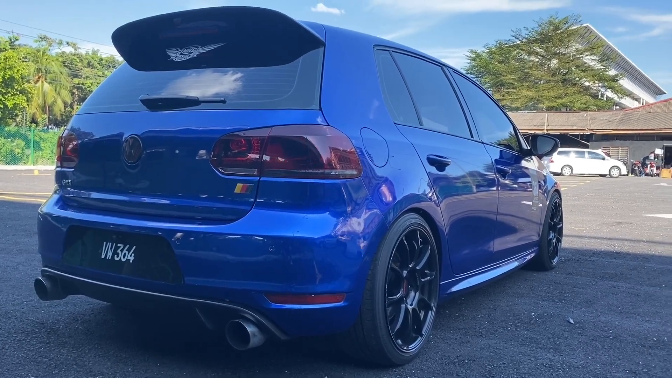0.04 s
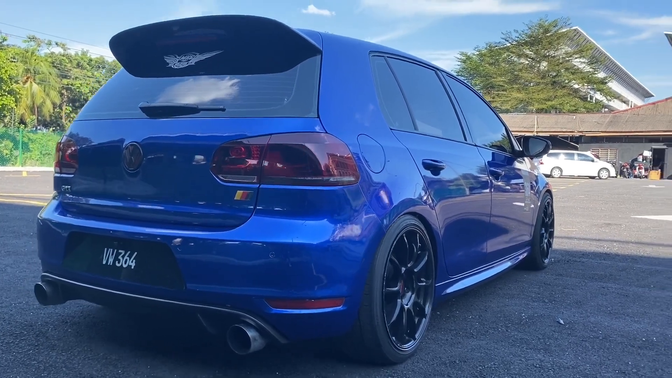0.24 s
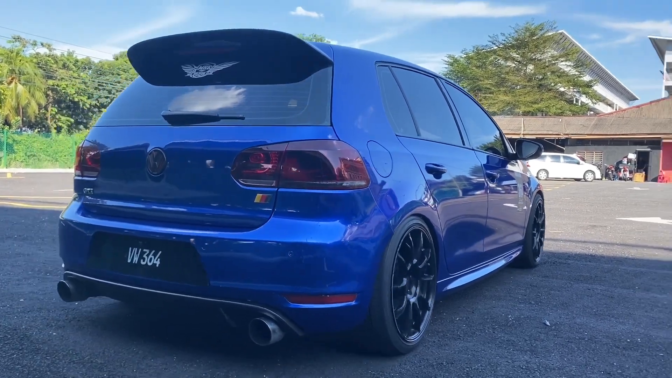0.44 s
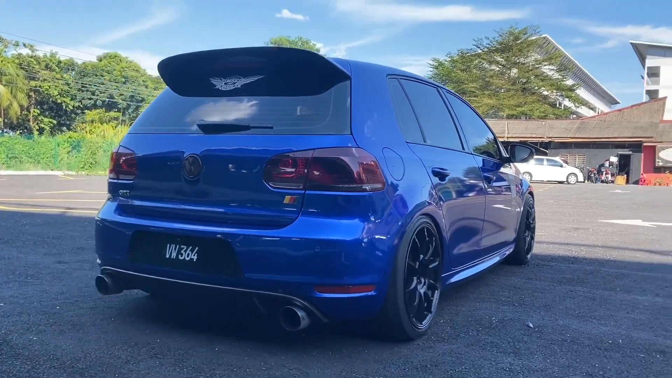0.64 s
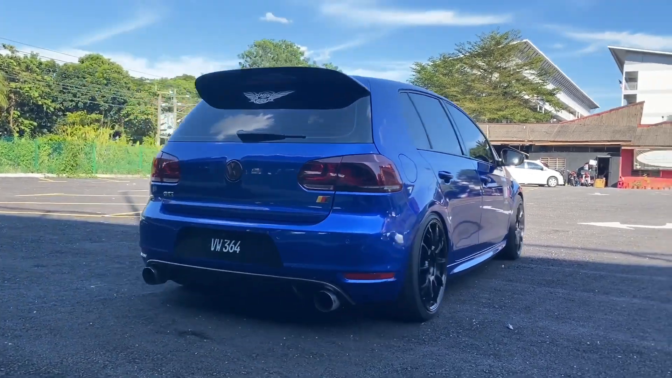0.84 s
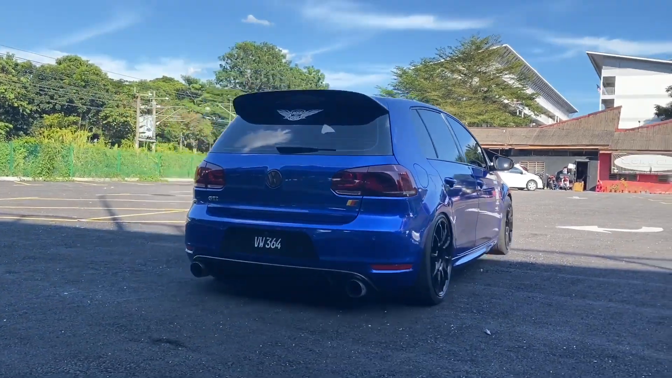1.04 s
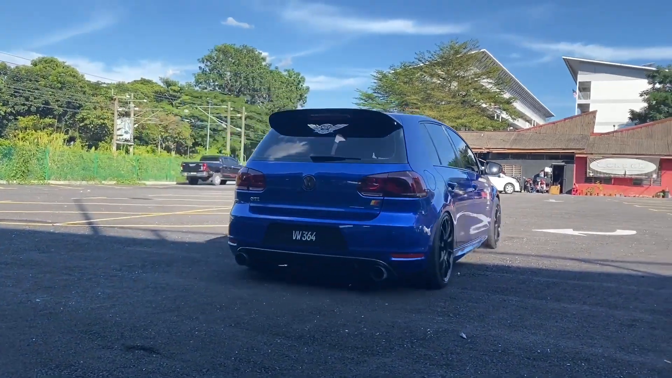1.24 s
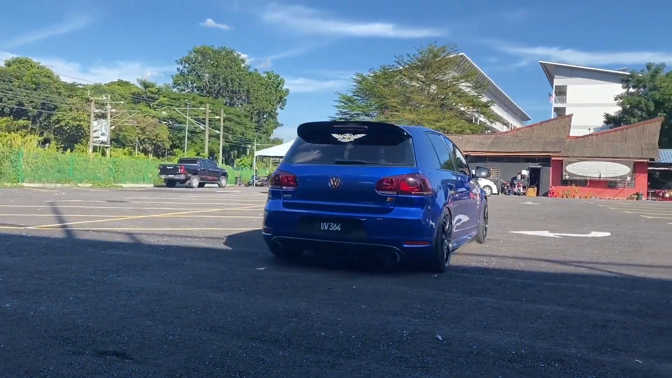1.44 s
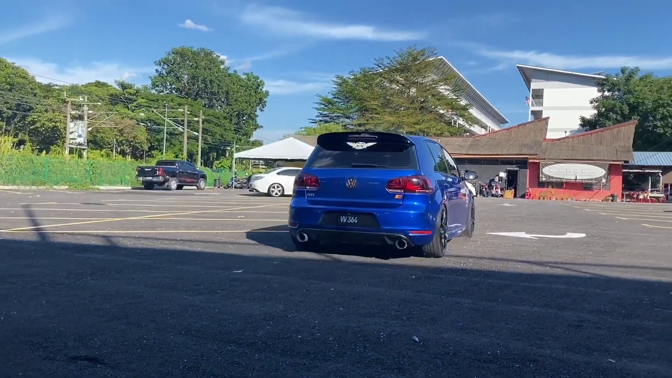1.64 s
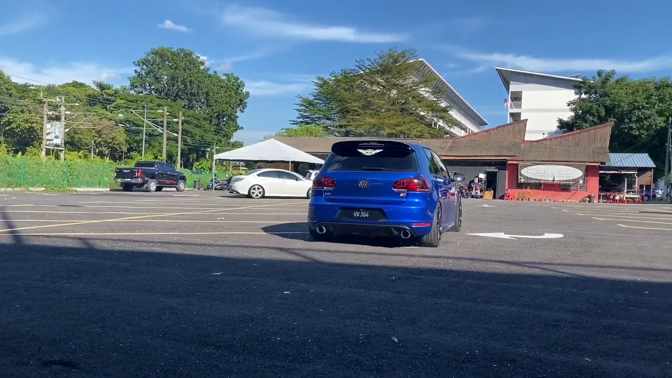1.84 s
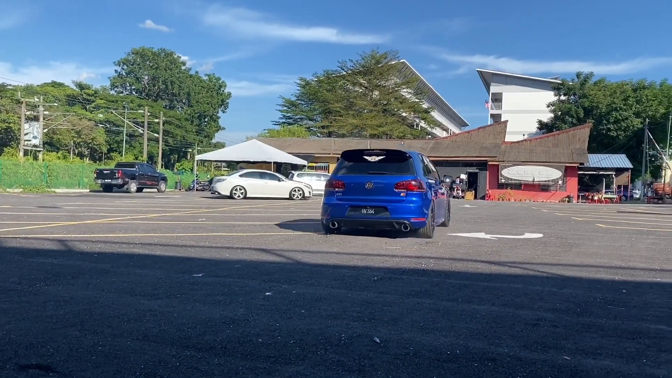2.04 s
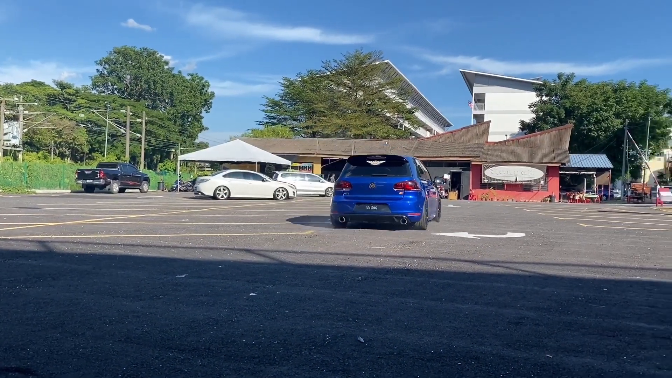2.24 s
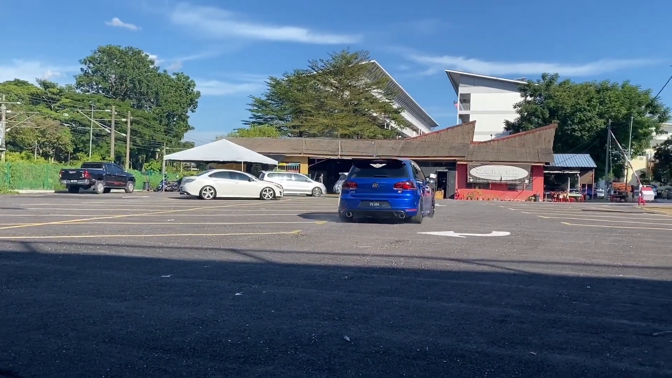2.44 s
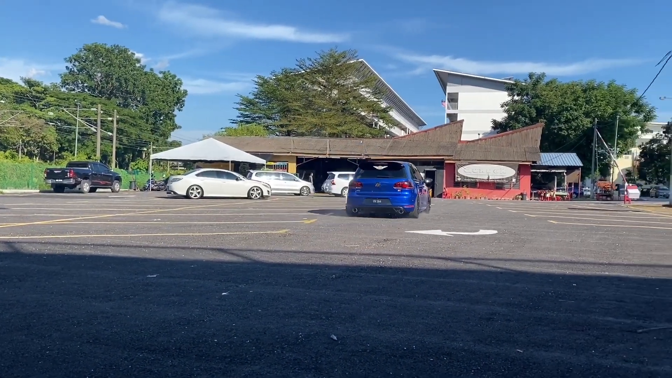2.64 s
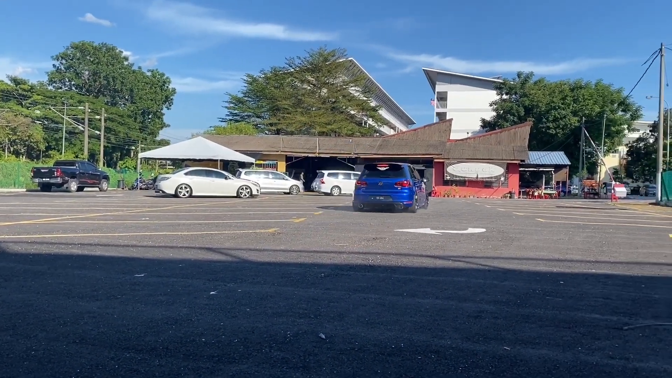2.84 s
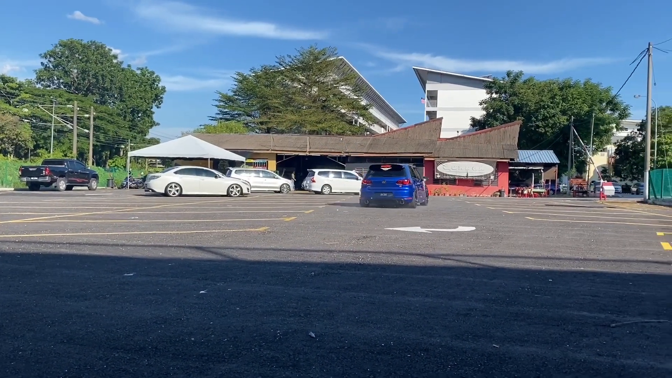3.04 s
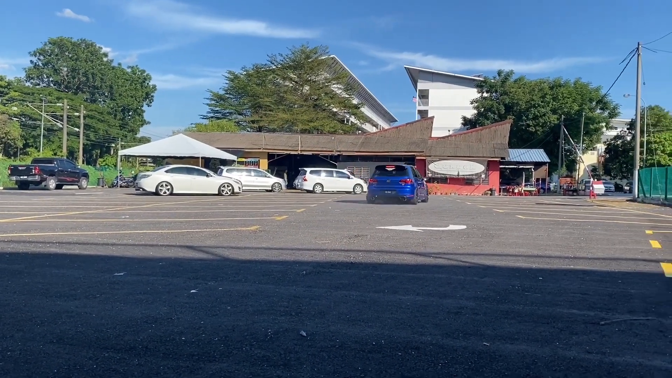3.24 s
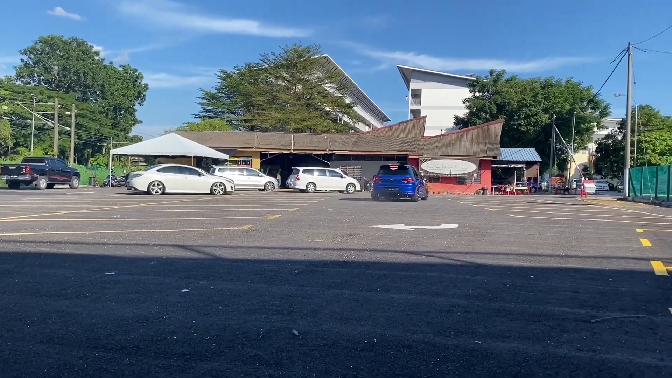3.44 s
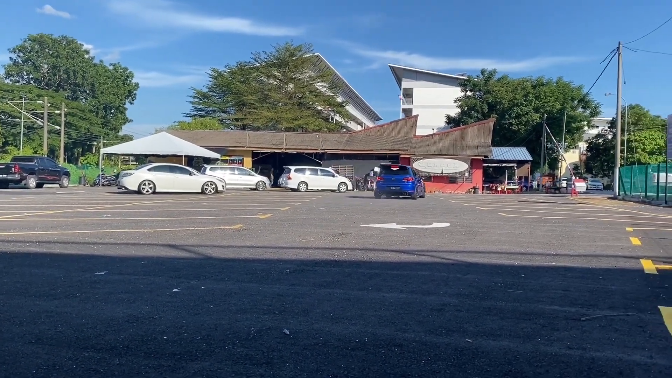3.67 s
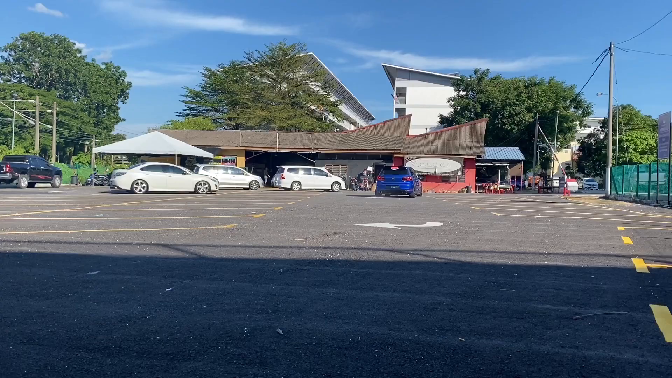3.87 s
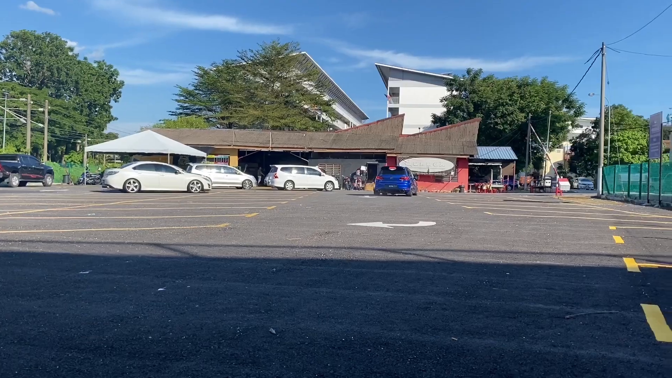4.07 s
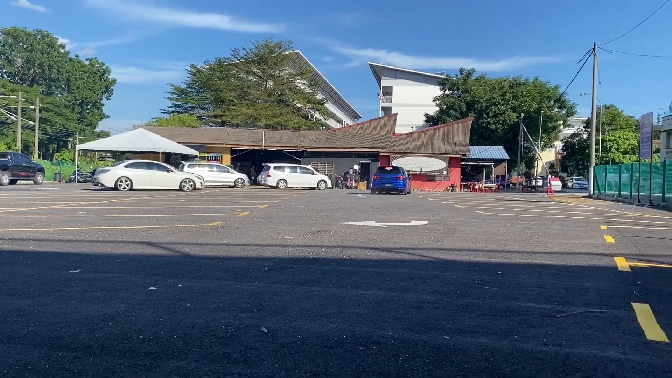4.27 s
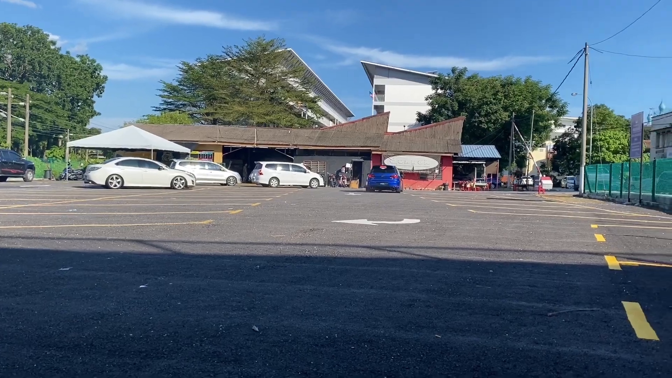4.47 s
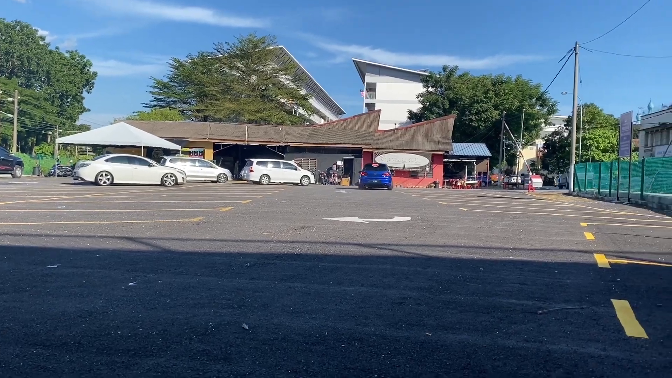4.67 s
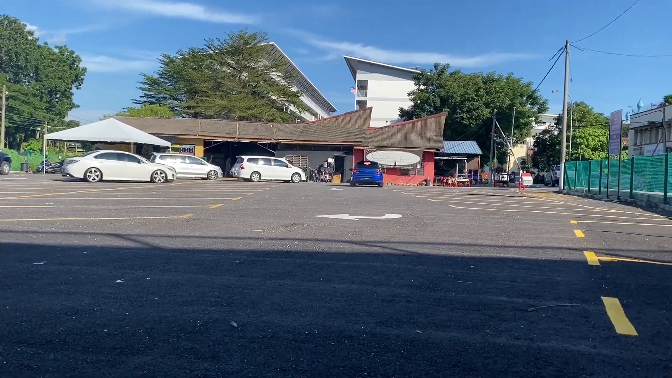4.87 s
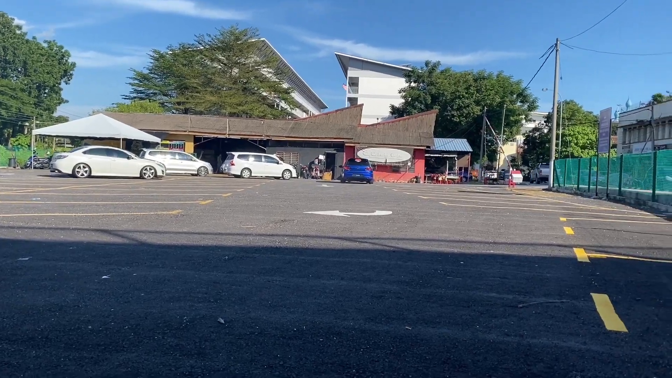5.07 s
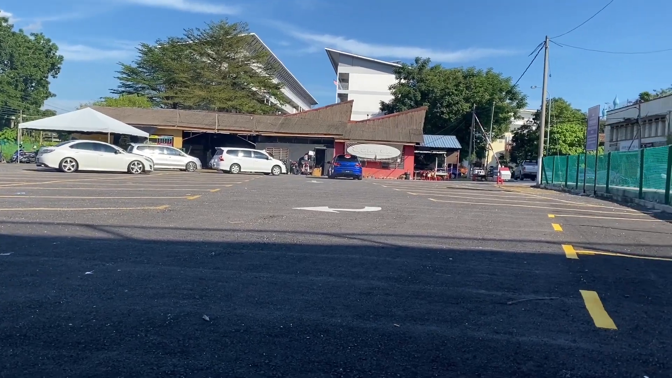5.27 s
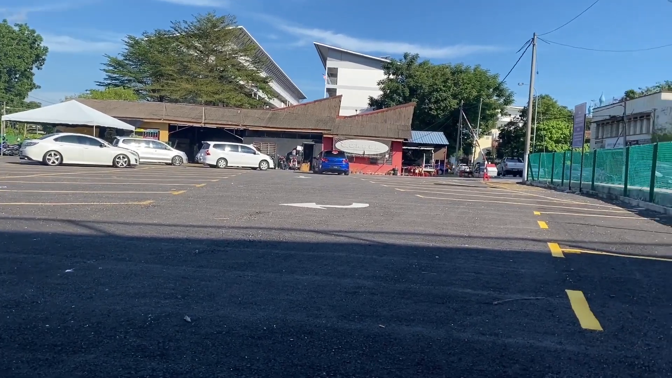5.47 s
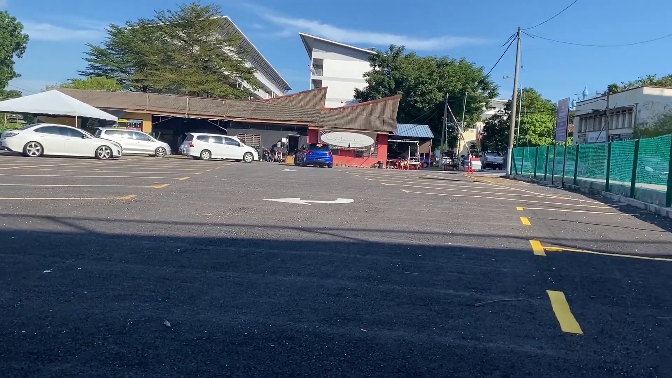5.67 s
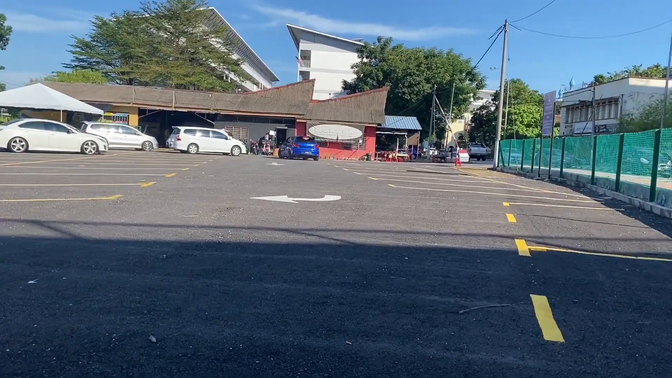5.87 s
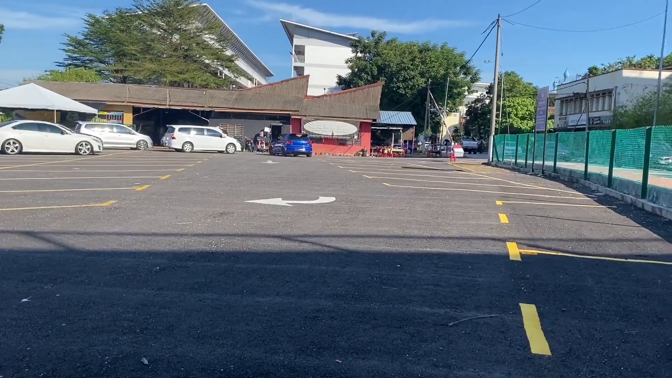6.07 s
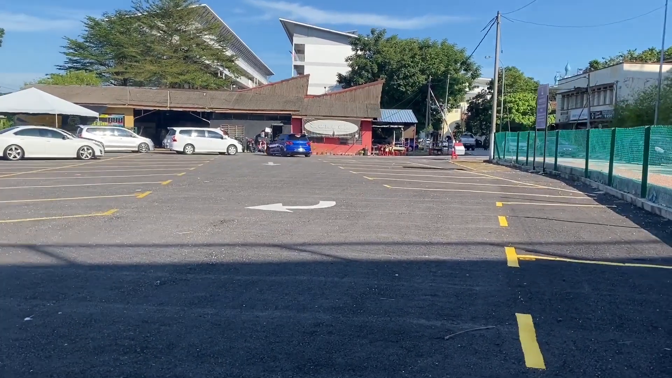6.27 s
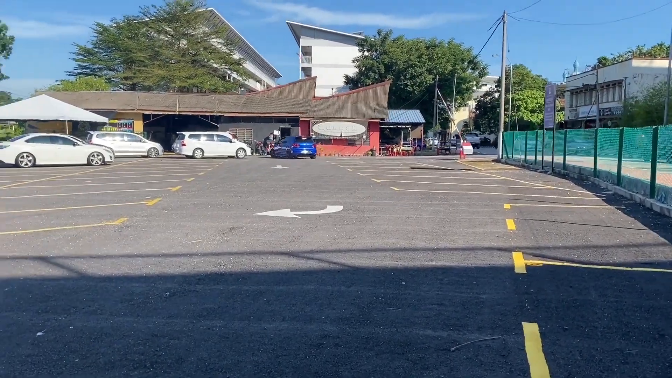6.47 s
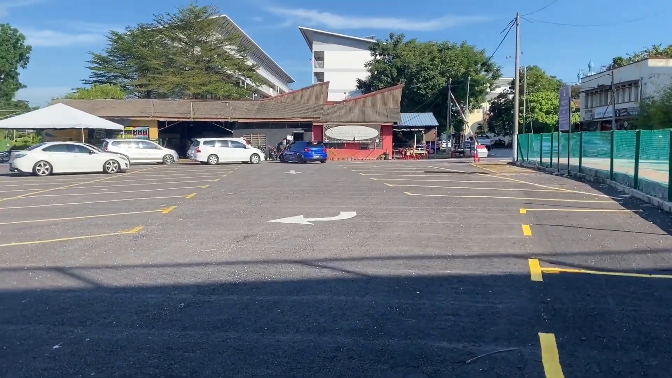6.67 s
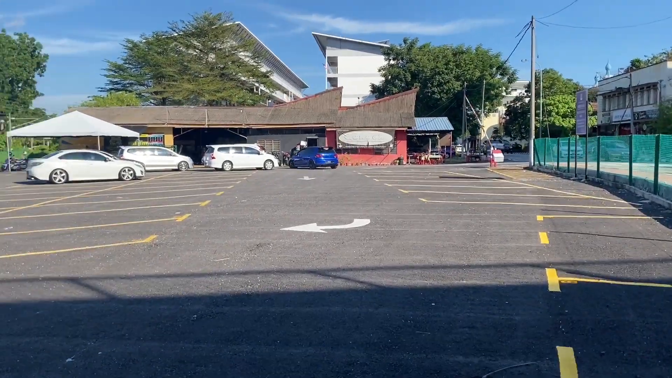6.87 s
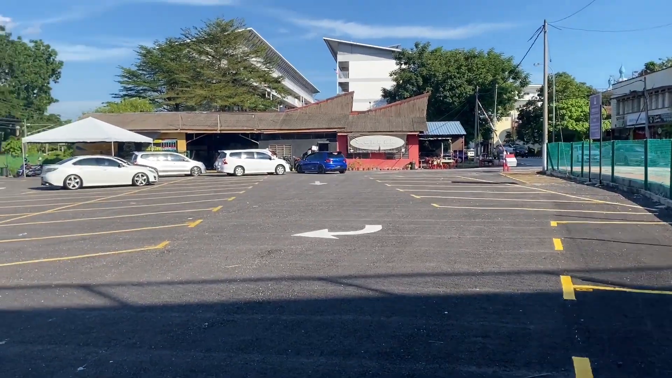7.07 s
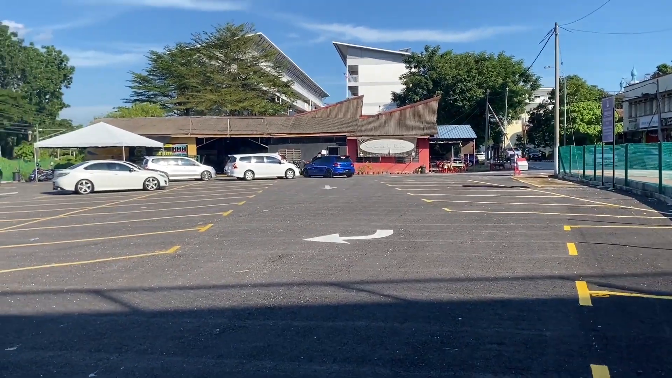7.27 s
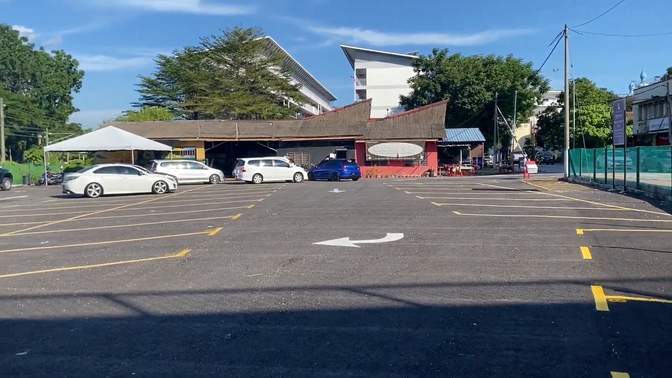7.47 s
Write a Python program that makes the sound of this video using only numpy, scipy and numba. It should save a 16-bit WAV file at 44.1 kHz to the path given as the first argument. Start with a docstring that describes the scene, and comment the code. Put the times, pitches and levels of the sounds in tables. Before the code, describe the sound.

A loud turbocharged hatchback blips and pulls away across an open car park, exhaust rasp climbing, then lifting off into distant burbling and soft traffic.

```python
"""In an open car park, a turbocharged four-cylinder hatchback with a loud exhaust pulls away from close by.
Each firing sends a pressure wave (the boom) and a burst of gas (bark and rasp) through the tailpipes.
At three seconds the driver lifts off: the turbo whistle winds down and the car burbles in the distance.
Tyres flick grit, buildings echo the exhaust, and filtered noise makes the traffic and hiss around the lot."""
import sys
import numpy as np
from scipy import signal
from scipy.fft import rfft, irfft, next_fast_len
from scipy.io import wavfile
from scipy.ndimage import uniform_filter1d
from numba import njit

SR = 44100
rng = np.random.default_rng(int(sys.argv[2]) if len(sys.argv) > 2 else 0)


def master_out(mix):
    """Clip the mix to full scale and print it as 16-bit PCM to the path in sys.argv[1]."""
    frames = np.transpose(np.atleast_2d(mix))
    ceiling = np.clip(frames, -1, 1)
    pcm = np.round(ceiling * 32767).astype(np.int16)
    wavfile.write(sys.argv[1], SR, pcm)


N = 331214  # length in samples
T = np.arange(N) / SR  # time in seconds
RING_LAG = .41  # share of a firing cycle by which the ringing of the pipe trails the pressure wave


def engine_speed():
    """A blip, a long pull and the lift-off set the firing rate; then the revs sag to idle."""
    # the engine (time [s], firing rate [Hz], level of the fundamental [dB])
    revs = [(0.0, 88, -20), (0.08, 98.3, -9.5), (0.1, 102.9, -10), (0.3, 91.45, -13.5), (0.59, 99.3, -16),
            (1.12, 109.8, -13.5), (1.37, 124.5, -15.5), (1.9, 159.5, -11.5), (2.35, 190.4, -20.5),
            (2.64, 209.7, -23), (2.77, 212, -24), (2.91, 200.4, -35.5), (2.97, 194.5, -34.5),
            (3.25, 143.8, -21.5), (3.35, 136.9, -21), (3.45, 136.8, -24.5)]
    sag_hz_per_s, idle_hz = 55, 61.67
    sink_db_per_s, idle_db = 11, -36.5
    hz, fundamental_db = curves(revs)
    sagging_s = np.maximum(T - revs[-1][0], 0)
    hz = np.maximum(hz - sag_hz_per_s * sagging_s, idle_hz)
    return hz, np.maximum(fundamental_db - sink_db_per_s * sagging_s, idle_db)


def boom(turns, drive, fundamental_db):
    """The clean low harmonics of the pressure wave; each overtone swells as it crosses a pipe resonance."""
    # standing waves of the exhaust pipe (frequency [Hz], level [dB])
    pipe = [(125, 13), (188, -12.5), (235, 3), (268, 6), (283, 6.5), (303, 1), (335, 0.5), (376, 5.5),
            (435, 1.5), (520, -3.5), (800, -8)]
    # loudness of harmonics 2, 3 and 4 (close by at full throttle and the reference rate [dB],
    # lost with the throttle shut [dB], gained per octave of revs [dB], power of distance)
    overtone_laws = [(-17, 14, 7.5, 0.93), (-13.5, 29, -1.5, 0.87), (-19, 21.5, -1.5, 0.79)]
    pipe_hz, pipe_db = np.transpose(pipe)
    dip_db = -2.5 * np.exp(-((T - 1.673) / 0.035) ** 2)  # the overtones dip briefly
    tone = undb(fundamental_db + .5 * walk(30)) * np.sin(2 * np.pi * turns)
    for k, law in enumerate(overtone_laws, 2):
        resonance_db = np.interp(np.log(k * drive[0]), np.log(pipe_hz), pipe_db)
        db = loudness(drive, *law) + resonance_db + dip_db
        tone = tone + undb(db + 1.5 * walk(20)) * np.sin(2 * np.pi * k * (turns - RING_LAG))
    return tone


def tailpipe(turns, drive):
    """Each firing cracks in the pipe, then puffs turbulent gas; the colour turns as the car draws away."""
    # colour of the drone in the tailpipe (frequency [Hz], level [dB])
    drone_colour = [(380, -30.5), (480, 1.5), (620, 1.5), (700, -8.5), (800, -28.5)]
    # resonances of the bark (frequency [Hz], half width [Hz])
    bark_modes = [(700, 134), (850, 140), (1130, 113)]
    # balance of the three bark resonances as the car turns away (time [s], level of each [dB])
    bark_balance = [(.4, -17, 0.5, -7), (0.851, -8.5, -4.5, -0.5), (1.2, -1, 0, -9), (1.7, -1, -1.5, -7),
                    (2.3, -4, -3, -4.5)]
    # ringing of the pipe tips, close by and from far behind (frequency [Hz], width [Hz], level [dB])
    near_tips = [(1654, 27, 0), (1815, 45, -5), (2206, 260, -1), (2716, 170, -3), (3380, 110, -9.5)]
    far_tips = [(1408, 61, 6.1), (1530, 99, 3), (1980, 130, 1.9), (2451.6, 99, 6.8)]
    # colours of the jet's edge and of its high hiss (frequency [Hz], level [dB])
    edge_colour = [(2700, -8.5), (3300, -1), (3800, 1), (4100, -2), (4450, -13), (5200, -40.5)]
    jet_colour = [(4200, -13.5), (5100, -6), (6200, -7.5), (7300, -13.5), (8500, -36.5), (10000, -28.5),
                  (14500, -56)]
    # single firings that crack out of the jet hiss (time [s], level [dB])
    cracks = [(1.852, -25), (2.963, -41)]
    gas_lag = .42  # share of a cycle by which the rush of gas follows the crack

    drone_flare, bark_flare, rasp_flare, jet_flare, _ = flares()
    drone_db = drone_flare + loudness(drive, full_db=-22.5, shut_db=10.5, octave_db=10, power=2.1)
    bark_db = bark_flare + loudness(drive, full_db=-25, shut_db=9.5, octave_db=11.5, power=2.25)
    rasp_db = rasp_flare + loudness(drive, full_db=-26, shut_db=20, octave_db=3, power=1.24)
    jet_db = jet_flare + loudness(drive, full_db=-31, shut_db=-2.5, octave_db=7.5, power=1.32)
    far, = curves([(1.0, 0.037), (1.35, 0.54), (1.95, 0.64)])

    # half orders growl as boost builds; at high revs the cracks drown in rushing gas
    growl, crisp = curves([(.95, 0.11, 0.49), (1.2, 0.3, 0.33), (1.9, 0.099, 0.27), (2.7, 0.15, 0.14)])
    # one cylinder in four fires a little harder
    throb = 1 + .3 * np.cos(np.pi / 2 * turns)
    lope = throb + growl * (-1.) ** np.round(turns)
    # the crank speed wanders under boost, which blurs the upper harmonics
    wander, = curves([(.9, .008), (1.25, .015), (1.6, .016), (3.4, .025)])
    crack = lope * firings(turns + wander * walk(70), scatter_db=1.2, jitter_s=.00003)
    crack = crisp * crack / crack.std()

    puff = puffs(turns, rise=.1, scatter_db=1.7)
    drone = steady(colour(crack + 0.5 * puff * air(side=0.15), drone_colour)) * undb(drone_db)

    gas = puff + .5 * puffs(turns, rise=.3, scatter_db=2.5)
    blow = lope * (crack + .4 * gas * air(side=.5))
    bark = 0
    for (hz, half_width), db in zip(bark_modes, curves(bark_balance)):
        bark = bark + band(blow, hz, half_width) * undb(db)
    bark = steady(bark) * undb(bark_db)

    # the treble comes in short, uneven spits
    spit = puffs(turns, rise=.07, scatter_db=2.2)
    spray = .7 * crack + (spit + .05) * air(side=.35)
    rasp = steady((1 - far) * resonate(spray, near_tips) + far * resonate(spray, far_tips))
    rasp = rasp * undb(rasp_db + 1.1 * walk(35))

    # the edge of the jet crackles with each firing; its high hiss follows with the rush of gas
    edge = colour(.3 * crack + (spit + .17) * air(side=.45), edge_colour)
    rush = 1 + 0.47 * np.cos(2 * np.pi * (turns - gas_lag))
    high_hiss = colour(rush * air(side=0.18), jet_colour)
    jet = steady(twin(edge + undb(-4.5) * high_hiss))
    jet = jet * (undb(jet_db) + snaps(cracks, decay_s=.005)) * undb(1.7 * walk(30))
    return drone + bark + rasp + jet


def burble(turns, drive):
    """Strong and weak firings shake the silencer between the harmonics."""
    # colours of the low rumble and of the silencer (frequency [Hz], level [dB])
    rumble_colour = [(25, -20), (42, -12), (60, -4), (145, -5.5), (200, -16), (400, -29.5)]
    silencer_colour = [(140, -10.5), (190, -2.5), (250, -7.5), (300, 3), (340, 8.5), (410, -4),
                       (580, -10.5), (850, -18), (1400, -55)]
    near_db, far_db = -37, -36.5  # low burble, before the flares: close by, and far off throttle
    cycle = turns.astype(int)
    overrun, = curves([(3.35, 0.02), (3.65, 0.96)])  # 0 under load, near 1 off throttle
    chance_sign = np.sign(rng.standard_normal(2048))[cycle]
    strength = .5 * (1 + overrun) * chance_sign + 0.46 * (-1.) ** cycle
    low = steady(colour(firings(turns, scatter_db=1.0, jitter_s=0.00099) * strength, rumble_colour))
    low_gain = (1 - overrun) * undb(near_db - 0.052 * drive[2]) + overrun * undb(far_db)

    # alternate cylinders add half orders under load; off throttle every firing rings the silencer
    nearest = np.round(turns).astype(int)
    uneven = (-1.) ** nearest * (1 - .45 * overrun) + overrun + .3 * rng.standard_normal(2048)[nearest]
    knocks = firings(turns, scatter_db=1.1, jitter_s=.00005) * uneven
    ring = steady(colour(knocks + 0.1 * overrun * rng.standard_normal(N), silencer_colour))
    ring_gain = undb(loudness(drive, full_db=-29, shut_db=17.5, octave_db=8, power=0.5))
    coasting_hum = envelope(start=3.6, attack=0.54, hold=1.1, release=1.1, db=-49)
    return (low * low_gain + ring * np.hypot(ring_gain, coasting_hum)) * undb(flares()[-1])


def snarl(turns, hz):
    """The upper orders snarl as they climb under boost; lower ones drone hollowly as they fall."""
    # colour of the climbing orders (frequency [Hz], level [dB])
    climb_colour = [(520, 4), (700, 7), (880, -2.5), (1050, -6.5), (1200, -7), (1750, -21.5)]
    # colour of the falling orders, which drone through the silencer (frequency [Hz], level [dB])
    hollow_colour = [(130, -1), (245, -14.5), (330, 3), (385, -9), (460, -16.5), (570, -14.5), (680, -24)]
    climbing = orders(turns, hz, climb_colour, np.arange(4.5, 10, .5), half_db=-6)
    falling = orders(turns, hz, hollow_colour, np.arange(2, 7.5, .5), half_db=-6)
    climbing = climbing * envelope(start=1.18, attack=0.22, hold=0.6, release=1.24, db=-38.5)
    return climbing + falling * envelope(start=3.5, attack=0.5, hold=1.05, release=.5, db=-43)


def chatter(turns):
    """Off throttle, uneven puffs flutter in the resonances of the pipe tips."""
    # flutters (start [s], attack [s], hold [s], release [s], level [dB], frequency [Hz], half width [Hz])
    flutters = [(3.428, 0.48, 0.31, 0.59, -56, 1864, 387), (4.005, 0.24, .2, 0.18, -58, 2360, 230),
                (3.5, 0.056, 1.27, 0.63, -65, 3500, 830)]
    alternate = 1 + .3 * (-1.) ** turns.astype(int)
    gas = (.25 + puffs(turns, rise=.18, scatter_db=1.8)) * alternate * air(side=.6)
    return sum(band(gas, hz, half_width) * envelope(*shape) for *shape, hz, half_width in flutters)


def firings(turns, scatter_db, jitter_s):
    """One pulse a cycle; the four cylinders differ, and each firing strays in size and time."""
    # strength of each cylinder in turn (level [dB])
    cylinder_db = [-0.13, 0.98, -0.95, 1]
    count = np.arange(1, int(turns[-1]))
    size_chance, time_chance = rng.standard_normal((2, len(count)))
    at = np.interp(count, turns, np.arange(N)) + jitter_s * SR * time_chance
    at = np.clip(at, 0, N - 2)
    size = undb(np.array(cylinder_db)[count % len(cylinder_db)] + scatter_db * size_chance)
    # share each pulse between the two nearest samples
    sample, part = at.astype(int), at % 1
    return np.bincount(sample, size * (1 - part), N) + np.bincount(sample + 1, size * part, N)


def puffs(turns, rise, scatter_db):
    """Gas after each firing: it swells over a small share of the cycle and dies before the next."""
    age = (turns % 1) / rise
    return age * np.exp(1 - age) * undb(scatter_db * rng.standard_normal(2048)[turns.astype(int)])


def orders(turns, hz, shape, multiples, half_db):
    """Wavering whole and half multiples of the firing rate that slide through a fixed (Hz, dB) colour."""
    shape_hz, shape_db = np.transpose(shape)
    shaken = turns + .014 * walk(70)
    total = 0
    for k in multiples:
        db = np.interp(k * hz, shape_hz, shape_db) + half_db * (k % 1 > 0) + 2.2 * walk(30)
        total = total + undb(db) * np.sin(2 * np.pi * k * (shaken - RING_LAG))
    return total


def flares():
    """The dB that flares of gas add to drone, bark, rasp, jet hiss and silencer."""
    # at the blip, twice as the clutch bites, as boost arrives, at lift-off and on the overrun
    # (time [s], half length [s], added drone [dB], bark [dB], rasp [dB], jet hiss [dB], silencer [dB])
    gas_flares = [(0.092, 0.12, -3.5, 2, 4.5, 6.5, 5), (1.107, 0.047, 4, 1.5, 0, 5, -4.5),
                  (1.241, 0.13, 8.5, 10.5, 1.5, 2, 7), (1.764, 0.12, -9, 8.5, 0, 6, -0.5),
                  (3.0, 0.19, 4, 10.5, 4, -3.5, -0.3), (4.06, 0.94, 12, 7, 4.5, -16.5, 1.6)]
    return sum(np.outer(added, np.exp(-((T - s) / half) ** 2)) for s, half, *added in gas_flares)


def loudness(drive, full_db, shut_db, octave_db, power):
    """Level in dB from the revs, the throttle and the distance."""
    hz, throttle, away_db = drive
    reference_hz = 100  # firing rate at which full_db holds, close by at full throttle
    return full_db - shut_db * (1 - throttle) + octave_db * np.log2(hz / reference_hz) - power * away_db


def resonate(x, modes):
    """Ring (Hz, width, dB) resonances that wander, swell and fade, with little sound outside their range."""
    drift = 0.015  # share by which the ringing wanders in the hot gas
    y = 0
    for hz, width, db in modes:
        # shift the resonance down to 0 Hz, smooth, and shift it back
        spin = np.exp(2j * np.pi * np.cumsum(hz * (1 + drift * walk(11))) / SR)
        pole = np.exp(-np.pi * width / SR)
        ringing = (signal.lfilter([1 - pole], [1, -pole], x * spin.conj()) * spin).real
        y = y + undb(db + 1.8 * walk(11)) * ringing
    edges_hz = [.88 * modes[0][0], 3600]
    return signal.sosfilt(signal.butter(4, edges_hz, "band", fs=SR, output="sos"), y)


def twin(x):
    """The farther of the two tailpipes arrives a little later and ripples the hiss."""
    lag_s, db = .0024, -5.5
    return x + undb(db) * np.array([np.interp(T - lag_s, T, channel) for channel in x])


def ports(x):
    """Two microphone ports hear the exhaust with different phase and level."""
    # phase between the ports (frequency [Hz], left leads by [radians])
    port_phase = [(100, -0.36), (300, 0.13), (600, 0.43), (1200, 0.76), (6500, 1.61), (8500, 2)]
    # level between the ports (frequency [Hz], left over right [dB])
    port_balance = [(300, 0.73), (700, 3.5), (1290, 5), (2400, 1.1), (4400, 3.5), (9000, 1.5)]
    size = next_fast_len(N + 2048, True)
    log_hz = np.log(np.maximum(np.arange(size // 2 + 1) * SR / size, 1))
    phase_hz, phase = np.transpose(port_phase)
    balance_hz, balance = np.transpose(port_balance)
    lead = np.interp(log_hz, np.log(phase_hz), phase)
    db = np.interp(log_hz, np.log(balance_hz), balance)
    half = np.array([[.5], [-.5]])  # each port takes half of the difference
    return irfft(rfft(x, size) * np.exp(1j * half * lead) * undb(half * db), size)[:, :N]


def turbo():
    """A thin, breathy whistle that flutters and falls as the turbine slows."""
    start_s, start_hz, slowing_s = 3.58, 7300, 2.2
    hz = start_hz * np.exp(-np.maximum(T - start_s, 0) / slowing_s)
    # fast random wavering, different in each ear, makes the whistle breathy
    phases = [np.cumsum(hz * (1 + .035 * walk(370))) / SR for _ in range(2)]
    whistle = np.sin(2 * np.pi * np.array(phases))
    return whistle * envelope(start_s, attack=0.072, hold=.15, release=1.9, db=-69) * undb(3.2 * walk(14))


def grit():
    """The tyres crunch over fine grit while they pull; short bursts of bright noise make a few snaps."""
    # short snaps: stones under the tyres, and late on one snap among the rustling (time [s], level [dB])
    short_snaps = [(2.189, -55), (2.93, -51), (3.071, -59), (3.39, -51), (7.29, -53)]
    crunch_colour = [(1500, 19.5), (3500, 9), (7000, -4.5), (10500, -5.0), (12000, -28.5), (15000, -12)]
    crunch = colour(air(side=0.54), crunch_colour) * undb(2.5 * walk(450))
    crunch = crunch * envelope(start=-0.43, attack=1.485, hold=1.49, release=0.94, db=-42.0)
    return crunch + snaps(short_snaps, decay_s=.012) * air(side=.5)


def buildings(pipes, low, away_db):
    """Echoes of the exhaust, with less of its bass; they gain on the direct sound with distance."""
    decay_s, damp = 1, 0.19  # time in which the bass of the echo falls by 60 dB; loss of treble per round
    lags = rng.integers(800, 4800, 8)  # samples
    highpass = signal.butter(2, 150, "high", fs=SR, output="sos")
    thrown = signal.sosfilt(highpass, (pipes + undb(-11.5) * low).mean(axis=0))
    return walls(thrown, lags, undb(-60 * lags / SR / decay_s), damp) * undb(-14 + 0.096 * away_db)


@njit
def walls(x, lags, gain, damp):
    """Eight delay lines that feed each other, duller on every round."""
    line, soft, out = np.zeros((8, 8192)), np.zeros(8), np.zeros((2, len(x)))
    for i in range(len(x)):
        total = 0.
        for k in range(8):
            soft[k] += (1 - damp) * (gain[k] * line[k, (i - lags[k]) & 8191] - soft[k])
            total += soft[k]
            out[k % 2, i] += soft[k]
        for k in range(8):
            line[k, i & 8191] = x[i] + soft[k] - total / 4
    return out


def surroundings():
    """Traffic noise, its bass alike in both ears, swells beyond the lot under a fitful high hiss."""
    # colours of the traffic and of the hiss (frequency [Hz], level [dB])
    traffic_colour = [(20, -17), (50, 5), (155, 9.5), (260, -6.5), (550, -11.5), (1200, -15.5), (1700, -17),
                      (2200, -23), (3300, -27.5), (5000, -43), (10000, -48.5)]
    hiss_colour = [(2500, -20.5), (5000, -8), (6300, -9.5), (8000, -20.5), (10500, -21.5), (12000, -35.5),
                   (15000, -34.5)]
    # bursts of rustling hiss (time [s], half length [s], level [dB])
    rustles = [(7.2, .04, -56.5), (7.345, 0.076, -52), (7.496, 0.051, -55)]
    late_s = np.maximum(T - 4.78, 0)  # the surroundings grow louder from here on
    mid, side = rng.standard_normal((2, N))
    side = signal.sosfilt(signal.butter(2, 330, "high", fs=SR, output="sos"), side)
    traffic = colour(mid + side * np.array([[1], [-1]]), traffic_colour) * undb(-42.5 + 2.5 * late_s)
    rustle = sum(undb(db) * np.exp(-((T - s) / half) ** 2) for s, half, db in rustles)
    hiss_gain = undb(-68 + 4 * late_s) + rustle * undb(2 * walk(90))
    hiss = colour(air(side=0.92), hiss_colour) * hiss_gain * undb(1 * walk(35))
    # a narrow whirr joins the traffic and sinks away
    whirr = band(air(side=0.68), 1643, 480)
    whirr = whirr * envelope(start=6.4, attack=.12, hold=.12, release=1.1, db=-55.5)
    return traffic + whirr + hiss


def undb(db):
    """Decibels to gain."""
    return 10 ** (np.asarray(db) / 20)


def curves(rows):
    """Each column of a table as a control, sample by sample."""
    s, *columns = np.transpose(rows)
    return [np.interp(T, s, c) for c in columns]


def envelope(start, attack, hold, release, db):
    """A gain that rises, holds and falls; times in seconds."""
    rising = (T - start) / attack
    falling = 1 - (T - start - attack - hold) / release
    return undb(db) * np.clip(np.minimum(rising, falling), 0, 1)


def snaps(rows, decay_s):
    """A gain that jumps and dies away at each (s, dB)."""
    fade_s = [np.where(T < s, decay_s / 10, decay_s) for s, _ in rows]
    return sum(undb(db) * np.exp(-np.abs(T - s) / fade) for (s, db), fade in zip(rows, fade_s))


def walk(rate):
    """Random levels held 1 / rate s and smoothed twice; spread near 1."""
    k = int(SR / rate)
    held = rng.standard_normal(N // k + 1)[np.arange(N) // k]
    return 1.3 * uniform_filter1d(uniform_filter1d(held, k), k)


def air(side):
    """Stereo white noise with the given side-to-mid ratio."""
    mid, apart = rng.standard_normal((2, N))
    return mid + side * apart * np.array([[1], [-1]])


def colour(x, points):
    """Causal filter with the given (Hz, dB) response; the result has rms 1."""
    size = next_fast_len(N + 8192, True)
    hz, db = np.transpose(points)
    octaves = np.log2(np.maximum(np.arange(size // 2 + 1) * SR / size, 1))
    # beyond the outer points the response falls by 40 dB per octave
    below = np.maximum(np.log2(hz[0]) - octaves, 0)
    above = np.maximum(octaves - np.log2(hz[-1]), 0)
    gain = undb(np.maximum(np.interp(octaves, np.log2(hz), db) - 40 * (below + above), -90))
    # fold the cepstrum so that the filter never sounds ahead of its input (minimum phase)
    cepstrum = irfft(np.log(gain), size)
    cepstrum[1:size // 2] *= 2
    cepstrum[size // 2 + 1:] = 0
    y = irfft(rfft(x, size) * np.exp(rfft(cepstrum)), size)[..., :N]
    return y / y.std()


def band(x, hz, half_width):
    """One steep-sided resonance, 14 dB down at its half width; the result has rms 1."""
    return colour(x, [(hz - half_width, -14), (hz, 0), (hz + half_width, -14)])


def steady(x):
    """Hold the rms of the channels' mean near 1 over a fifth of a second."""
    power = uniform_filter1d(np.atleast_2d(x).mean(axis=0) ** 2, SR // 5)
    return x / np.sqrt(power + 1e-9)


def scene():
    """Revs, throttle and distance drive the exhaust; echoes, turbo, grit and surroundings join it."""
    # the driver's foot (time [s], throttle [0-1])
    foot = [(0, 0.73), (.07, 0.91), (.4, 1), (.62, 0.67), (1.5, 0.65), (1.85, 1), (2.55, 1), (2.95, 0.73),
            (3.4, 0.09), (3.7, 0.31), (4.8, 0.24), (5.5, 0.17)]
    # the car draws away (time [s], distance [m])
    path = [(.3, 2.04), (1, 2.64), (2, 7.5), (3, 14.9), (4, 25.2), (6, 35.2)]
    crack_lag = .12  # share of a cycle by which the crack follows the pressure wave
    hz, fundamental_db = engine_speed()
    throttle, = curves(foot)
    metres, = curves(path)
    away_db = 20 * np.log10(metres / metres[0])
    drive = hz, throttle, away_db
    hunting = np.interp(hz, [62, 68], [.018, .001])  # the engine runs less evenly near idle
    turns = np.cumsum(hz * (1 + hunting * walk(25))) / SR  # firing cycles so far

    exhaust = tailpipe(turns - crack_lag, drive) + snarl(turns, hz) + burble(turns, drive)
    pipes = ports(exhaust) + chatter(turns)
    low = ports(boom(turns, drive, fundamental_db))
    return low + pipes + buildings(pipes, low, away_db) + turbo() + grit() + surroundings()


def record(dry):
    """The phone rounds the loudest peaks and cuts the top."""
    top_hz = 15200
    rounded = dry / (1 + np.abs(dry / .95) ** 8) ** (1 / 8)
    return signal.sosfilt(signal.ellip(8, .2, 70, top_hz, fs=SR, output="sos"), rounded)


dry = scene()
out = record(dry)
master_out(out)
```